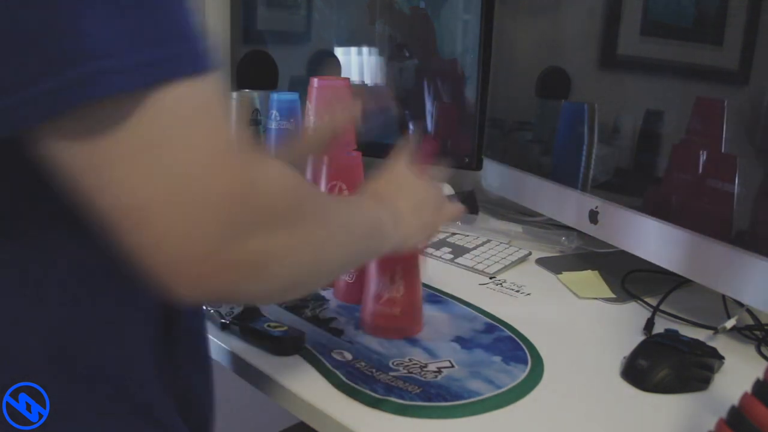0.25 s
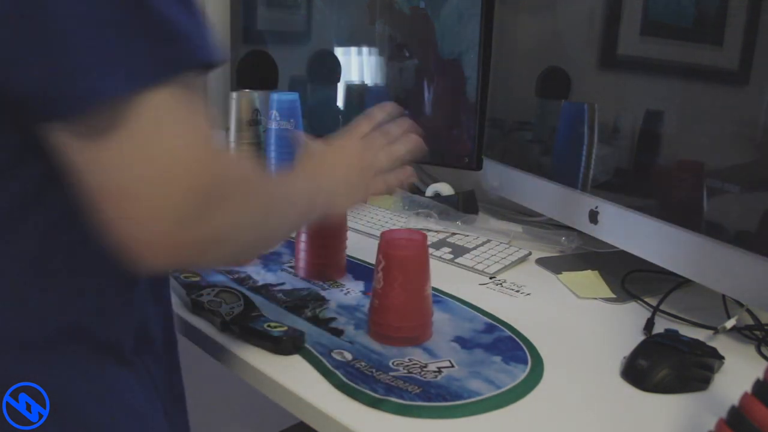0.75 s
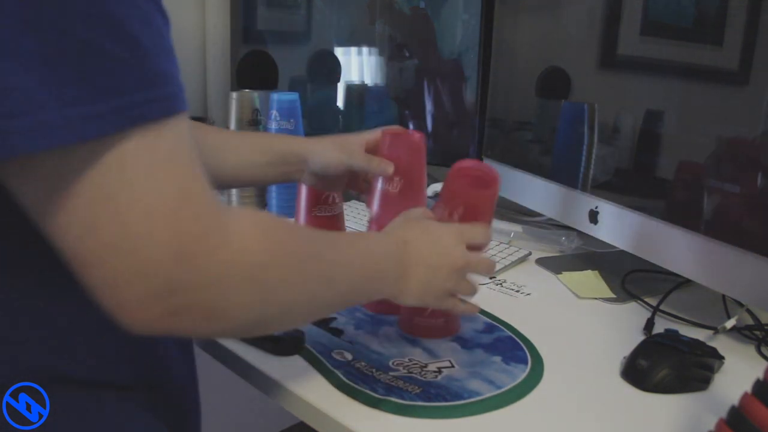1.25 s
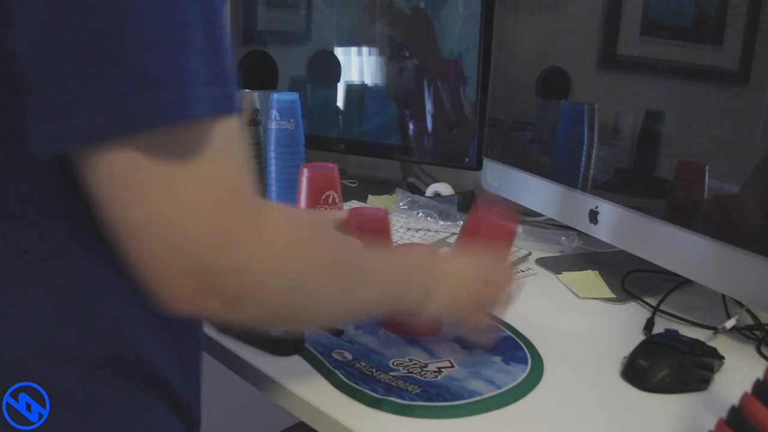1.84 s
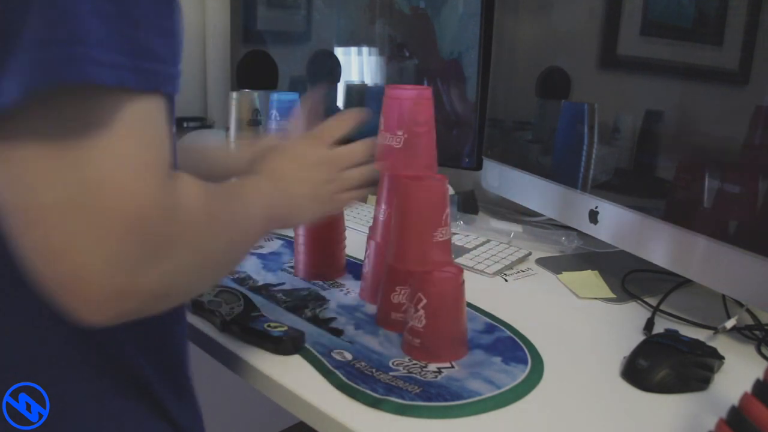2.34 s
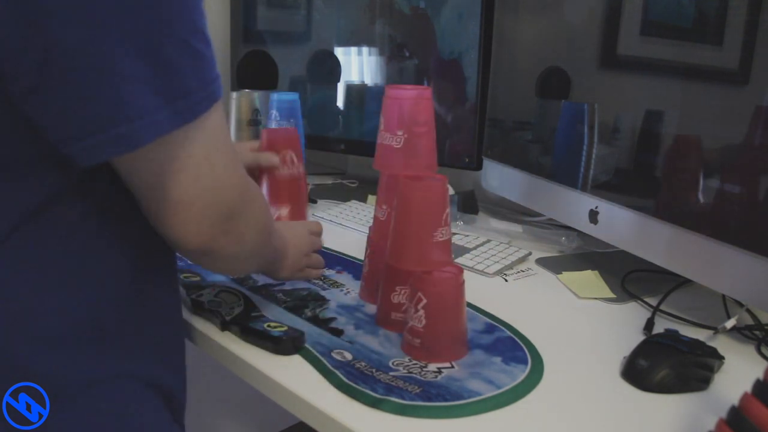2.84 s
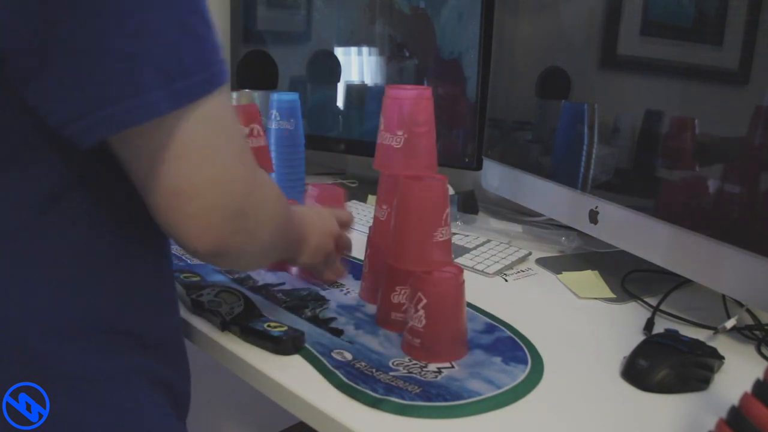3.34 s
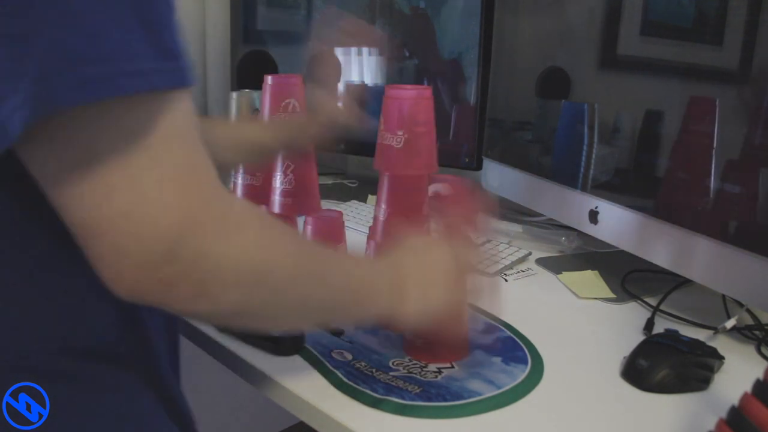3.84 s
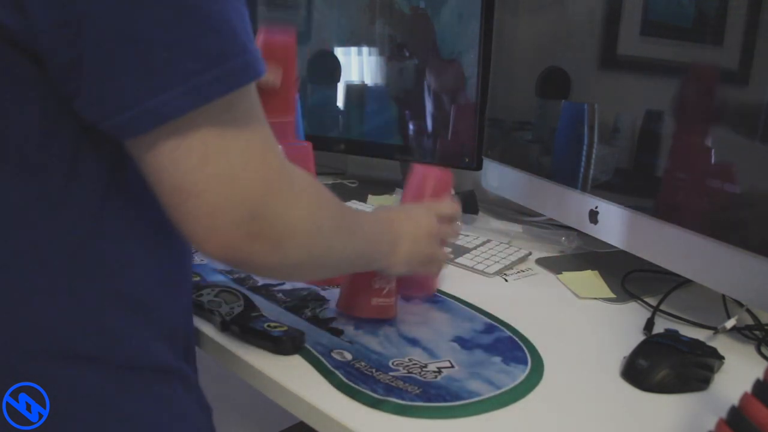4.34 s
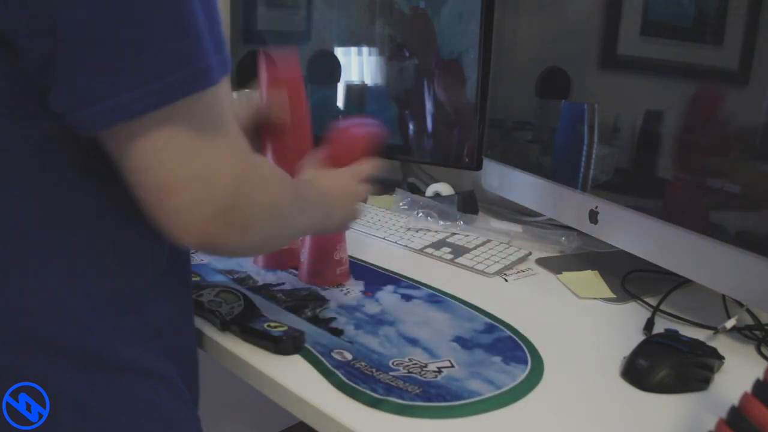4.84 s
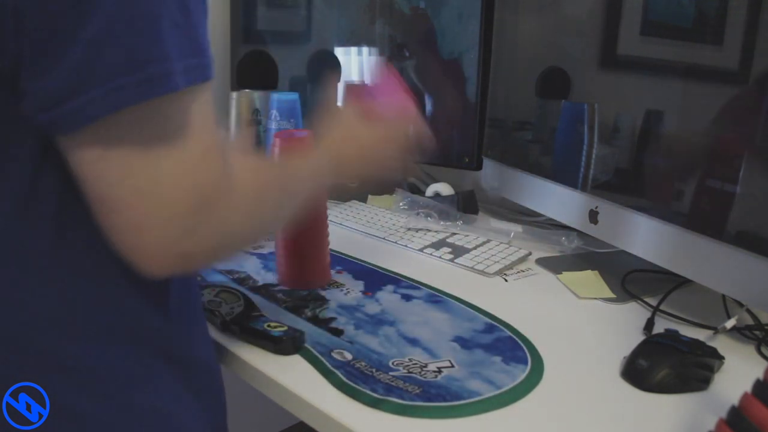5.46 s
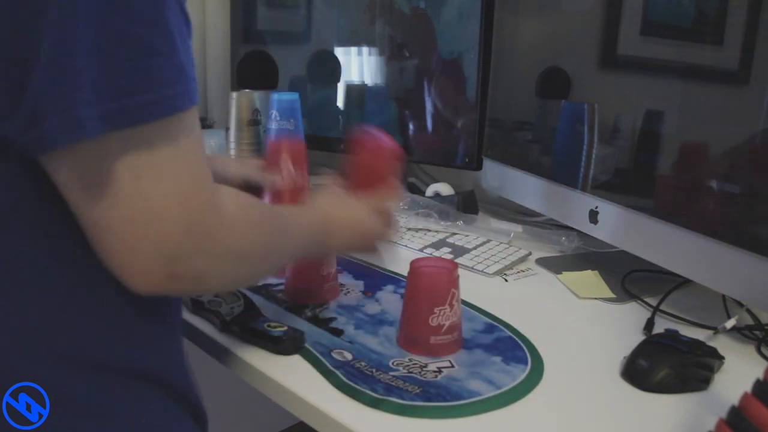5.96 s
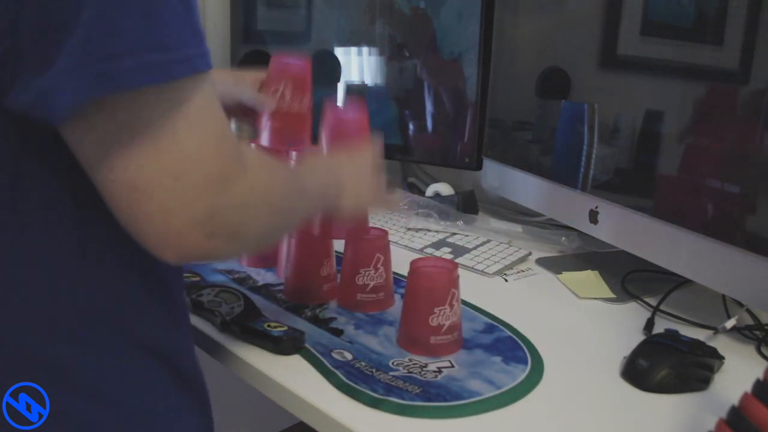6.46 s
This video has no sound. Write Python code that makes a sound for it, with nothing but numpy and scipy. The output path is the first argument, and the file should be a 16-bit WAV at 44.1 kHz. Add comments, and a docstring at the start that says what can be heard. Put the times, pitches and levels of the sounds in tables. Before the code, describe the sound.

Close stereo sound of hard plastic cups being speed-stacked on a mat over a desk in a small furnished room with short echoes and faint steady hush. One hollow knock lands at 0 s; from 0.2 s contacts crowd together with a rasping slide, loudest around 0.5-0.6 s, nearly overloading. Knocks spread out from 0.8 to 1.7 s, then pause until 2.0. Light taps lead to a strong clack at 2.3, with separate hits near 2.7 and 2.9, then very faint ticks to 3.4. A second run begins about 3.5, with bright ringing and a scrape near 4.05, and rapid clatter around 4.4-4.7 and 5.0. After 5.3 there is a brief lull; strong clacks at 5.7, softer taps near 5.9, then regular hollow knocks from 6.1 until the end, about 6.7. Each blow is short, popping and dry, with a small desk thump.

```python
"""Hard plastic cups are stacked and collapsed fast on a mat on a desk, heard close up in a small furnished room.
A blow falls at once, a dense loud run follows within the first second, then blows spread out to a pause before 2 s.
Sparse, partly faint blows lead to a second fast run from about 3.5 s, a short lull near 5.4 s and a last run.
Each blow pops trapped air, rings cup walls and rims and thumps the desk; cups slide over each other, and a cup
out of the hand rings on. Room echoes and a faint hush surround it; the near stereo microphone overloads if hit hard."""
import sys
import numpy as np
from scipy import signal
from scipy.fft import rfft, irfft, next_fast_len
from scipy.io import wavfile
from scipy.ndimage import uniform_filter1d

SR = 44100
rng = np.random.default_rng(int(sys.argv[2]) if len(sys.argv) > 2 else 0)


def materialize(psi):
    """Save the field psi as 16-bit PCM at rate SR to the path in sys.argv[1].

    A 1-D psi becomes a single channel; in a 2-D psi each row is a channel.
    """
    bounded = np.clip(np.atleast_2d(psi).T, -1, 1)
    quanta = np.round(bounded * 32767).astype(np.int16)
    wavfile.write(sys.argv[1], SR, quanta)


N = 295558


def gain_of(db):
    """Decibels to gain."""
    return np.exp(np.asarray(db) * np.log(10) / 20)


def evened(x):
    """Scales to rms 1."""
    return x / np.sqrt(np.mean(x ** 2) + 1e-20)


def read(points, hz):
    """Reads a spectrum table on a log frequency axis."""
    f, value = np.transpose(points)
    return np.interp(np.log(hz + 1), np.log(f + 1), value)


def add(mix, s, sound):
    """Mixes a sound in at time s."""
    part = mix[round(s * SR):][:len(sound)]
    part += sound[:len(part)]


def colour(x, db_at):
    """Filters along the last axis by a function from Hz to dB."""
    size = next_fast_len(x.shape[-1])
    gain = gain_of(db_at(np.fft.rfftfreq(size, 1 / SR)))
    return irfft(rfft(x, size) * gain, size)[..., :x.shape[-1]]


def flattened(x):
    """Divides out the smoothed spectrum, so that no pitch is favoured."""
    spectrum = rfft(x)
    power = uniform_filter1d(abs(spectrum) ** 2, size=3)
    return irfft(spectrum / np.sqrt(power + 1e-9))


# Faint noise of the room and microphone: (frequency [Hz], relative density [dB per Hz])
HUSH_COLOUR = [(20, -13), (50, -10.5), (120, 4), (250, -2), (600, -6.5), (1400, -7.5), (3000, -12.5),
               (5000, -13), (8000, -17), (15500, -29.5)]
HUSH_DB = -62  # rms over both channels


def hush():
    """Steady faint room and microphone noise, partly shared by left and right."""
    mid, side = rng.standard_normal((2, N))
    pair = np.array([mid + 0.52 * side, mid - 0.29 * side])
    return gain_of(HUSH_DB) * evened(colour(pair, lambda f: read(HUSH_COLOUR, f)))


# Dying away of the small furnished room: (frequency [Hz], t60 [s])
ROOM_DECAY = [(100, 0.22), (300, 0.31), (700, 0.21), (2000, 0.24), (5000, 0.24), (13000, 0.17)]
# How alike the echoes reach left and right: (frequency [Hz], likeness [0 to 1])
ECHO_LIKENESS = [(100, 0.67), (500, 0.91), (1500, 0.73), (4000, 0.75), (10000, 0.1)]


def tail(size=SR // 2, start=90):
    """Sparse echoes of random sign, alike left and right in the bass, each band dying at its own speed."""
    taps = np.zeros((2, size))
    at = np.arange(start, size - 20, 20)
    at = at + rng.integers(0, 20, (2, len(at)))
    np.put_along_axis(taps, at, rng.choice([-1., 1.], at.shape), 1)
    hz, t, (a, b) = signal.stft(taps, SR, nperseg=256)
    likeness = np.clip(read(ECHO_LIKENESS, hz), 0, 1)[:, None]
    shared = np.sqrt((1 + likeness) / 2) * a
    apart = np.sqrt((1 - likeness) / 2) * b
    decay = gain_of(-60 * t / read(ROOM_DECAY, hz)[:, None])
    echoes = np.array([shared + apart, shared - apart]) * decay
    out = signal.istft(echoes, SR, nperseg=256)[1][:, :size]
    out[:, :start] = 0
    return out / np.linalg.norm(out[0])


def room(x):
    """Three sets of echoes take turns quickly, so the room's tail stays smooth and favours no pitch."""
    turn = 2 * np.pi * 12 * np.arange(N) / SR  # 12 turns a second
    shares = [np.sqrt(2 / 3) * np.cos(turn + k * 2 * np.pi / 3) for k in range(3)]
    return sum(signal.oaconvolve((x * w)[None], tail(), axes=1)[:, :N] for w in shares)


# Colour of plastic scraping on plastic, before each slide's own tilt: (frequency [Hz], level [dB])
SCRAPE_COLOUR = [(100, -2.5), (250, -1), (700, 5), (1500, -8), (3000, -6.5), (4400, -6.5), (8000, -12.5),
                 (15000, -26)]
# Cups sliding into and out of each other, level before the tilt:
# (start [s], loudest [s], end [s], level [dB], brightness tilt [dB per octave])
SLIDE_ROWS = [(0.197, 0.235, 0.36, -33.5, -2), (0.37, 0.577, 0.8, -27.5, -1),
              (0.744, 0.872, 1.15, -48.5, 2.3), (1.196, 1.593, 1.76, -47.5, 1.1),
              (1.872, 1.98, 1.995, -63, 2.5), (2.0, 2.273, 2.29, -51, -1.5),
              (2.506, 2.584, 2.68, -54.5, 1.5), (2.875, 2.895, 3.2, -47, -0.2),
              (3.28, 3.531, 3.56, -63.5, -8), (3.929, 4.054, 4.33, -28, -2.5),
              (4.381, 4.39, 4.57, -44, 1.5), (4.57, 4.71, 4.75, -31, -0.1), (4.898, 5.0, 5.15, -49, -2),
              (5.139, 5.19, 5.27, -36.5, 0.7), (5.298, 5.302, 5.42, -52, 1.7),
              (5.41, 5.452, 5.51, -57.5, 0.5), (5.81, 5.918, 6.05, -50, -0.2), (6.075, 6.146, 6.7, -42, -3)]
SLIDE_RISE_DB, SLIDE_FADE_DB, SLIDE_BEND = 8.5, 25.5, 1.39  # drop at start and at end; curvature


def slide(start, top, end, db, tilt_db):
    """Small scrapes of uneven size come in clumps as ribs catch; the slide swells, then fades."""
    t = np.arange(start, end, 1 / SR)
    size, luck, place, clump = rng.standard_normal((len(t), 4)).T
    catch_db = 3.5 * size ** 2 / 2 + 3. * evened(uniform_filter1d(clump, size=500))
    scrapes = luck * (place > 1.3) * gain_of(np.minimum(catch_db, 17))
    out = evened(colour(scrapes, lambda f: read(SCRAPE_COLOUR, f)))
    out = colour(out, lambda f: tilt_db * np.log2((f + 100) / 1000))
    top = np.clip(top, start + .001, end - .001)
    before = np.interp(t, [start, top], [1, 0])
    after = np.interp(t, [top, end], [0, 1])
    level_db = db - SLIDE_RISE_DB * before ** SLIDE_BEND - SLIDE_FADE_DB * after ** SLIDE_BEND
    return start, out * gain_of(level_db) * signal.windows.tukey(len(t), .04)


def decaying_tone(hz, db, t60, t):
    """One mode: a sine that starts at a level and loses 60 dB in t60 seconds."""
    return gain_of(db - 60 * t / t60) * np.sin(2 * np.pi * hz * t)


def ring(modes, t, luck, uneven_db=2., detune=.03):
    """Dying modes; every cup and striking point weighs and tunes them a little differently."""
    hz, db, t60 = np.transpose(modes)[:, :, None]
    weigh, tune = luck[:2, :len(modes), None]
    # neighbours swing opposite ways, filling the gaps between them
    sign = (-1.) ** np.arange(len(modes))[:, None]
    return (sign * decaying_tone(hz * (1 + detune * tune), db + uneven_db * weigh, t60, t)).sum(0)


# Rim modes of a cup out of the hand: (frequency [Hz], level [dB], t60 [s])
LOOSE_RIM = [(4040, -2, 0.071), (4140, -6.5, 0.076), (4330, -5, .11), (4420, -4.5, .07)]
# Blows that set it off: (time [s], level [dB], wall pitch [Hz])
LOOSE_ROWS = [(0.476, -23, 2600), (0.586, -21, 2000), (0.88, -30, 1780), (1.579, -37, 1680),
              (2.569, -42, 1570), (2.908, -31, 1770), (3.763, -35, 1250), (4.037, -15.5, 2765),
              (4.631, -24, 1790), (4.702, -16.5, 1980), (4.907, -51, 2070), (4.977, -26.5, 1600),
              (5.037, -29, 2120), (5.283, -38.5, 1600), (5.921, -38, 2440)]
LOOSE_WALL_DB, LOOSE_WALL_T60_S = 7, .025


def loose(s, db, wall_hz):
    """A free cup rings longer and cleaner than a held one."""
    modes = LOOSE_RIM + [(wall_hz, LOOSE_WALL_DB, LOOSE_WALL_T60_S)]
    luck = rng.standard_normal((2, len(modes)))
    return s, gain_of(db) * ring(modes, np.arange(8192) / SR, luck, detune=.006)


# Modes of the desk under the mat: (frequency [Hz], level [dB], t60 [s])
DESK_MODES = [(62.4, -5.5, 0.22), (116.1, -8.5, 0.28), (146, -15.5, .1), (184, -9, 0.021),
              (233.4, -1.5, 0.079), (310, -4, 0.073)]


def desk(t, luck):
    """The heavy board swings up slowly and thumps."""
    return ring(DESK_MODES, t, luck[2:, 60:], detune=0.093) * (1 - np.exp(-t / 0.0059))


# Colour of the dry snap: (frequency [Hz], level before hardness [dB])
SNAP_COLOUR = [(1000, -16.5), (3000, 7), (6500, 9.5), (9000, 7), (12000, -0.5), (16000, -10.5)]
SNAP_SLOPE, SNAP_DB = 1.153, 14  # level = hardness times slope plus offset dB; likewise WALL and RIM


def snap(hard_db, t, luck):
    """A short noise burst without pitch, louder on harder contacts."""
    burst = flattened(luck[2, ::-1] * gain_of(-60 * t / 0.044)) * gain_of(-60 * t / 0.1)
    return colour(burst, lambda f: read(SNAP_COLOUR, f) + SNAP_SLOPE * hard_db + SNAP_DB)


# Low modes of the cup body: (frequency [Hz], level [dB], t60 [s])
BODY_MODES = [(349, -20.5, 0.038), (436, -18.5, 0.019), (530.5, -13, 0.027), (617, -11, 0.022),
              (783, -8, 0.013), (840, -11, 0.026), (981, -6, 0.01), (1088, -6.5, 0.02), (1215, -8, 0.012),
              (1435, -21.5, 0.0097)]
# Modes of the cup wall: (frequency [Hz], level before hardness [dB], t60 [s])
WALL_MODES = [(1444, 2.1, 0.004), (1740, 7.4, 0.0084), (1911, 1.7, 0.013), (2026, 2.5, 0.01),
              (2330, 4.1, 0.0065), (2620, 4.36, 0.0072), (3053, 0.97, 0.0053)]
# Modes of the cup rim: (frequency [Hz], level before hardness [dB], t60 [s])
RIM_MODES = [(3230, 1.8, 0.0034), (3815, 2.1, 0.0097), (4093, 4.9, .008), (4350, 2.5, 0.0098),
             (4610, 4.3, 0.0088), (5120, 4.7, 0.0045), (5650, 4.2, 0.0056), (6220, 3.7, 0.00097)]
WALL_SLOPE, WALL_DB = 0.96, 1.5
WALL_TOP_DB = -3  # the wall's hardness level goes no higher
RIM_SLOPE, RIM_DB = 0.85, -3
FREE_WALL_HZ, FREE_WALL_OCTAVES = 1850, .3  # centre and random spread of the free wall's pitch


def cup(air_hz, hard_db, t, luck):
    """Trapped air pops and the body rings; harder contacts bring up wall and rim."""
    wall_db = min(WALL_SLOPE * hard_db + WALL_DB, WALL_TOP_DB)
    rim_db = RIM_SLOPE * hard_db + RIM_DB
    wall_hz = FREE_WALL_HZ * 2 ** (FREE_WALL_OCTAVES * luck[4, 0])
    air = decaying_tone(air_hz, -3, 0.022, t)
    body = ring(BODY_MODES, t, luck[2:], uneven_db=2.5, detune=0.038)
    free = decaying_tone(wall_hz, -3, 0.014, t)  # the part of the wall that no finger holds
    wall = free + ring(WALL_MODES, t, luck[2:, 20:], detune=.035)
    rim = ring(RIM_MODES, t, luck[2:, 40:], detune=0.04)
    return air + body + gain_of(wall_db) * wall + gain_of(rim_db) * rim


def chatter(chatter_s, t, luck):
    """A first contact and a dense dying run of further ones, evened in colour so it adds no pitch of its own."""
    touches = luck[0] * (luck[1] > 1.6) * 0.66 * np.exp(-t / max(chatter_s, .001))
    touches[0] = 1
    touches = flattened(touches) * np.exp(-t / 0.049)
    return touches / np.linalg.norm(touches)


# Blows of the cups, chatter decay before flattening and a common 49 ms fade: (time [s], strength [dB],
# trapped air pitch [Hz], weight on the desk [dB], hardness [dB], chatter decay constant [s])
BLOW_ROWS = [(0.001, -11, 1060, -14.5, -23.5, 0.014), (0.204, -20.5, 470, -3.5, -24.5, 0.04),
             (0.238, -23.5, 866, -11, -10, 0.015), (0.286, -31, 443, -26, -0.5, 0.0028),
             (0.346, -22.5, 690, -30, -16, 0.012), (0.365, -31, 1280, -22, 4.5, 0.015),
             (0.371, -13, 700, -13, -12, 0.013), (0.406, -8, 920, -32, -7, 0.011),
             (0.475, 1, 804, -38, -12.5, 0.0048), (0.497, 3, 1280, -10.5, -9, 0.0091),
             (0.517, -2, 690, -20, -13, 0.0055), (0.582, -3, 1020, -25, -4.5, 0.014),
             (0.629, -7.5, 740, -22, -28, 0.0047), (0.683, -8, 860, -9.5, -12, 0.032),
             (0.742, -22.5, 920, -19, -2.5, .006), (0.759, -15, 1300, -15, -23.5, 0.036),
             (0.774, -26, 1200, -19, 0.5, 0.0066), (0.83, -14.5, 744, -31, -19, 0.044),
             (0.848, -10, 698, -38, -3, 0.038), (0.875, -11, 980, -37, -5, 0.015),
             (0.957, -13, 850, -12, -13, 0.03), (1.012, -15.5, 820, -17, -8, .007),
             (1.098, -29.5, 570, -12.5, -10, 0.0061), (1.168, -9, 668, -22, -18, 0.023),
             (1.273, -30, 780, -18.5, -9, 0.014), (1.293, -27.5, 750, -24.5, -11.5, 0.015),
             (1.387, -14, 790, -15, -15, 0.0056), (1.472, -18, 875, -9.5, -8.5, 0.0087),
             (1.578, -12, 1100, -11.5, -11, 0.0044), (1.684, -25, 568, -5, -8.5, 0.01),
             (1.998, -18.5, 884, -15, -12.5, 0.013), (2.147, -20, 578, -26, -25.5, .006),
             (2.194, -22, 694, -42.5, -21.5, 0.0053), (2.24, -19, 810, -46, -38, 0.011),
             (2.25, -19.5, 560, -32.5, -25, .014), (2.295, -3.5, 643, -38.5, -21, 0.015),
             (2.495, -26, 500, -10.5, -11, 0.0051), (2.557, -26, 997, -15.5, -9.5, 0.016),
             (2.569, -19.5, 642, -5.5, -9, 0.0083), (2.737, -9.5, 686, -16.5, -17, .012),
             (2.879, -35, 760, -12.5, -11, .008), (2.89, -30, 750, -26, -9, .008),
             (2.907, -7.5, 814, -24, -17, .008), (2.965, -17.5, 1220, -25, -13.5, 0.0083),
             (3.029, -33, 1180, -9.5, -25, 0.0067), (3.075, -40, 755, -17, -10, .01),
             (3.148, -43, 725, -24, -22, .01), (3.28, -43, 730, -23, -8, 0.0091),
             (3.424, -43.5, 1130, -10, -0.5, 0.0066), (3.451, -22.5, 690, -4, -20.5, .006),
             (3.492, -26.5, 730, -0.5, -31, .012), (3.569, -10.5, 770, -29, -21, 0.0077),
             (3.633, -5.5, 825, -21.5, -24.5, 0.018), (3.761, -5, 700, -30.5, -24, 0.008),
             (3.93, -18.5, 606, -14, -24, 0.014), (3.939, -13, 1263, -22, -21, .011),
             (3.975, -11, 593, -25.5, -14, .008), (4.007, -29, 780, -22, 1, .007),
             (4.036, -11, 520, -32, 1.5, 0.0033), (4.074, -3, 850, -17, -12.5, .005),
             (4.166, -16.5, 720, -15.5, -14, 0.0082), (4.216, -21.5, 596, 0, -17.5, 0.013),
             (4.345, -58.5, 842, 5, -6.5, .008), (4.377, -25, 1030, -31, -1.5, .009),
             (4.383, -7.5, 1410, -15, -18.5, 0.0023), (4.452, -18, 673, -14.5, -23, .009),
             (4.478, -24, 970, -29, -7.5, 0.0076), (4.541, -26.5, 520, -14, -16.5, .01),
             (4.577, -13.5, 975, -29, -12.5, 0.011), (4.589, -8.5, 640, -10.5, -14.5, 0.0017),
             (4.63, -10.5, 867, -30, -12.5, 0.0034), (4.651, -9, 704, -21, -9.5, 0.015),
             (4.702, -6, 847, -37, -7, 0.0035), (4.71, -18, 830, -4.5, -24, 0.0035),
             (4.904, -30, 517, -18, -16, 0.0096), (4.948, -19, 730, -11, -11, 0.023),
             (4.975, -11.5, 950, -20.5, -4.5, 0.0084), (5.01, -5, 513, -8.5, -10, 0.0096),
             (5.036, -9, 717, -2, -7, 0.017), (5.106, -19.5, 1230, -25, -12, 0.0059),
             (5.161, -19.5, 730, -29, -11.5, 0.0075), (5.178, -15, 720, -25.5, -17, 0.026),
             (5.223, -27, 515, 4, -20, .008), (5.282, -15, 560, -10, -6.5, .005),
             (5.458, -43.5, 910, -33, -11, .005), (5.611, -14, 762, -12, -25, 0.007),
             (5.679, -10.5, 894, -18.5, -19, 0.0038), (5.683, -2.5, 792, -27, -26, .005),
             (5.817, -36.5, 413, -28, -12, .017), (5.821, -23.5, 507, -8.5, -18, 0.012),
             (5.869, -32.5, 920, -24, -25, .008), (5.897, -17.5, 520, -10, -23.5, .006),
             (5.919, -21.5, 480, -31, -2.5, 0.0025), (6.073, -13, 670, -9.5, -18, 0.011),
             (6.165, -17.5, 720, -5.5, -14.5, 0.0086), (6.263, -19.5, 670, -2, -17.5, 0.011),
             (6.307, -6, 740, -23, -29.5, 0.0044), (6.4, -12.5, 727, -26, -21.5, 0.0091),
             (6.466, -16.5, 910, -29, -20.5, 0.012), (6.518, -6.5, 790, -23, -22.5, 0.0028),
             (6.556, -18, 647, -26, -23, 0.019), (6.595, -17, 1200, -31, -20, 0.01),
             (6.667, -13, 780, -28, -31, 0.0045), (6.674, -5, 860, -39, -22, 0.0095)]


def blow(row, luck):
    """Chattering contacts drive the air, the cup and the snap; the desk thumps once."""
    s, db, air_hz, desk_db, hard_db, chatter_s = row
    t = np.arange(8192) / SR
    short = t[:2048]
    struck = cup(air_hz, hard_db, short, luck) + snap(hard_db, short, luck)
    out = gain_of(desk_db) * desk(t, luck)
    add(out, 0, signal.fftconvolve(struck, chatter(chatter_s, short, luck)))
    return s, gain_of(db) * out


PORT_LEAD = .55  # rms lead or lag of each port [samples]
LOW_CUT_HZ = 181


def scene():
    """Direct cups at the two microphone ports, their echoes and the hush."""
    cups = np.zeros(N)
    for row, luck in zip(BLOW_ROWS, rng.standard_normal((len(BLOW_ROWS), 5, 2048))):
        add(cups, *blow(row, luck))
    for row in LOOSE_ROWS:
        add(cups, *loose(*row))
    for row in SLIDE_ROWS:
        add(cups, *slide(*row))
    # a small wandering lead between the spaced ports widens the treble
    wander = evened(uniform_filter1d(rng.standard_normal(N), 3000))
    lead = PORT_LEAD * wander * np.gradient(cups)  # slope times lead shifts the wave in time
    near = np.array([cups + lead, cups - lead]) + gain_of(-2.5) * room(cups)
    # the microphone passes little deep bass
    low_cut = signal.butter(3, LOW_CUT_HZ, "high", fs=SR, output="sos")
    return signal.sosfilt(low_cut, near) + hush()


# Lean of the stereo microphone: (frequency [Hz], left minus right [dB])
PORT_LEAN = [(60, 8), (150, 1), (300, 2.2), (600, -0.9), (2000, -1), (10000, -1.7)]
EDGE_HZ = 15800  # upper band limit


def record(dry):
    """The two ports lean by frequency; the input clips; then the band limit."""
    left = colour(dry[0], lambda f: read(PORT_LEAN, f) / 2)
    right = colour(dry[1], lambda f: -read(PORT_LEAN, f) / 2)
    clipped = np.clip(np.array([left, right]), -1, 1)
    low_pass = signal.firwin(255, EDGE_HZ, window=("kaiser", 6), fs=SR)
    return signal.oaconvolve(clipped, low_pass[None], "same")


dry = scene()
out = record(dry)
materialize(out)
```